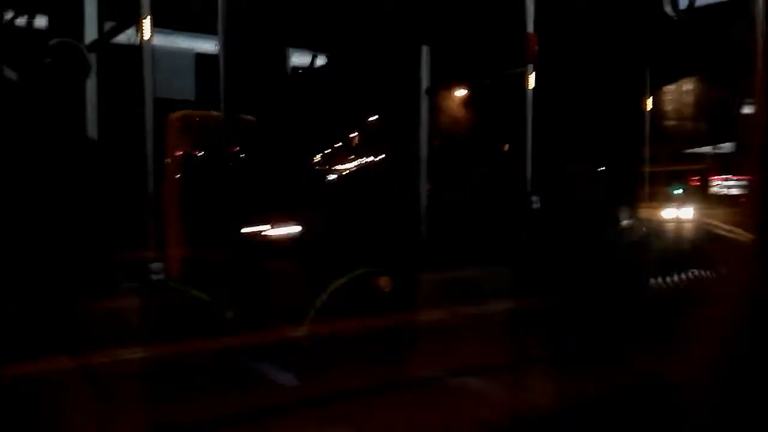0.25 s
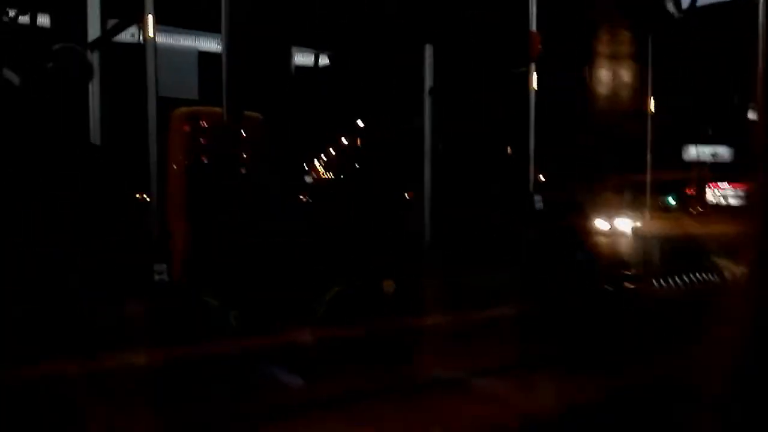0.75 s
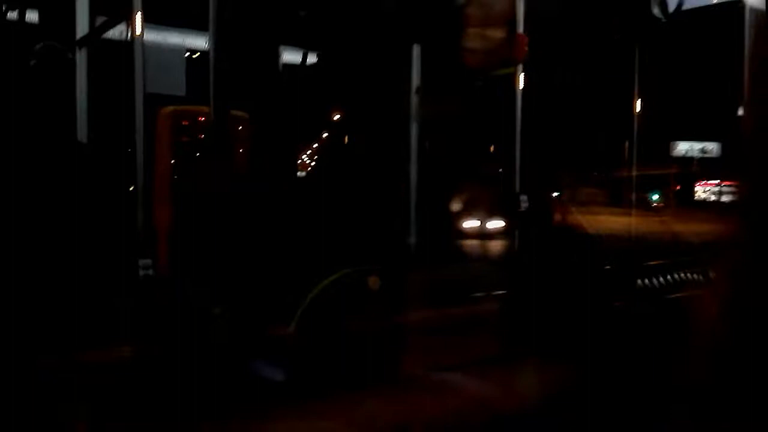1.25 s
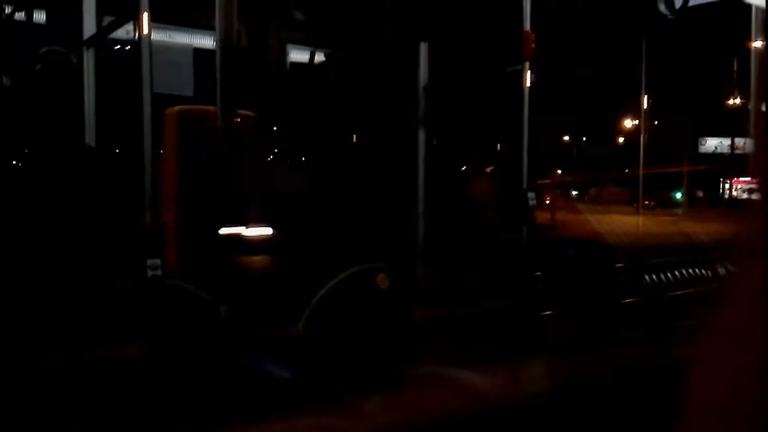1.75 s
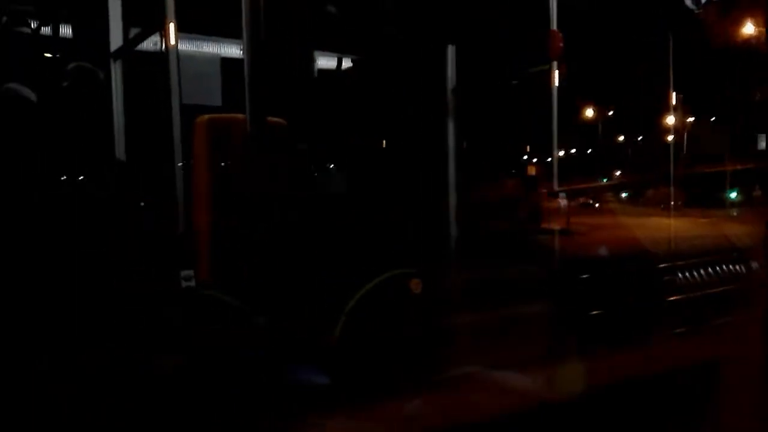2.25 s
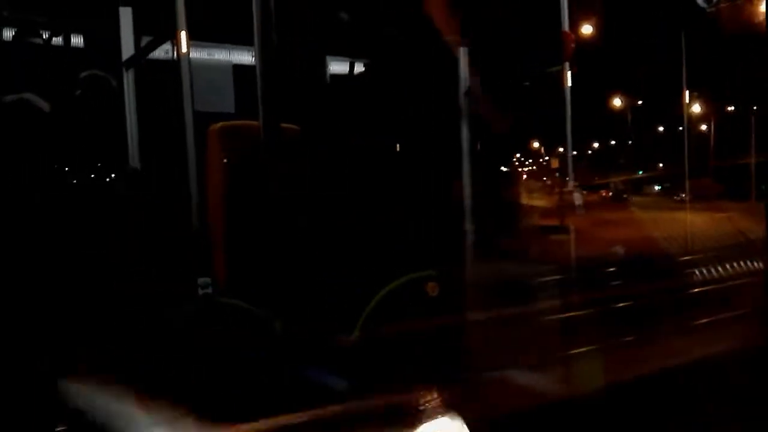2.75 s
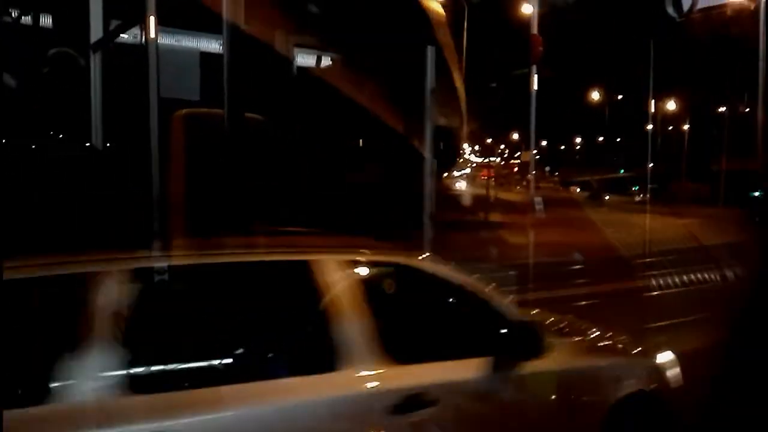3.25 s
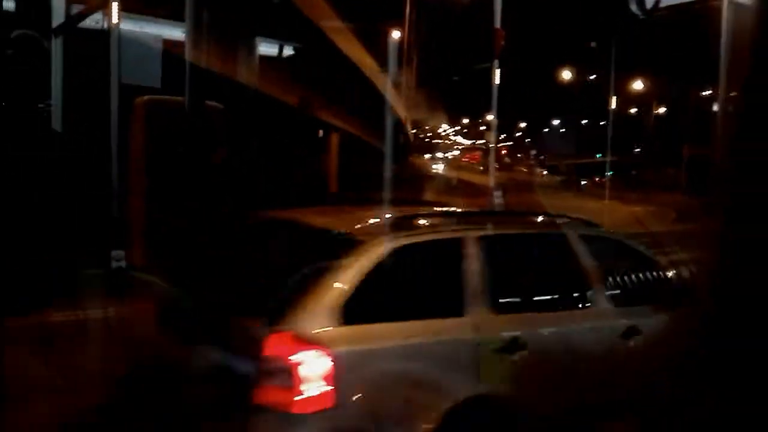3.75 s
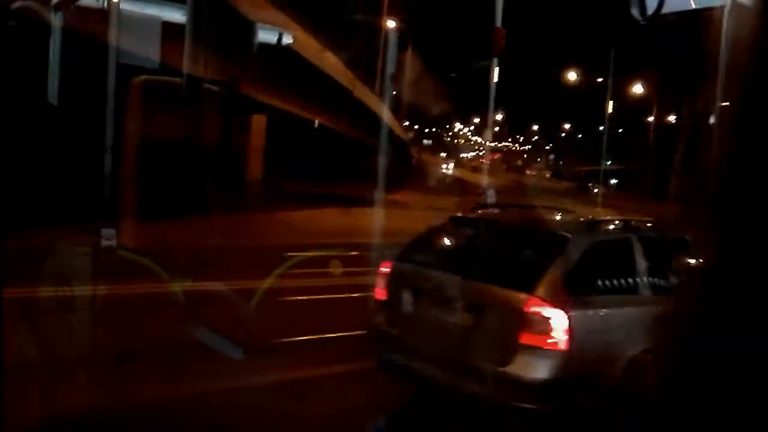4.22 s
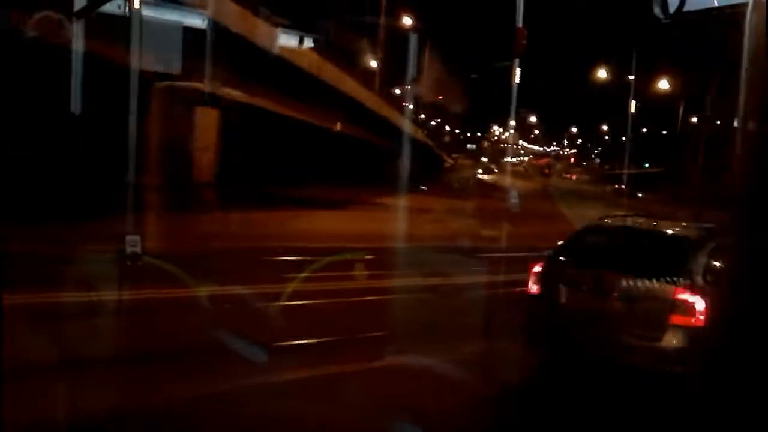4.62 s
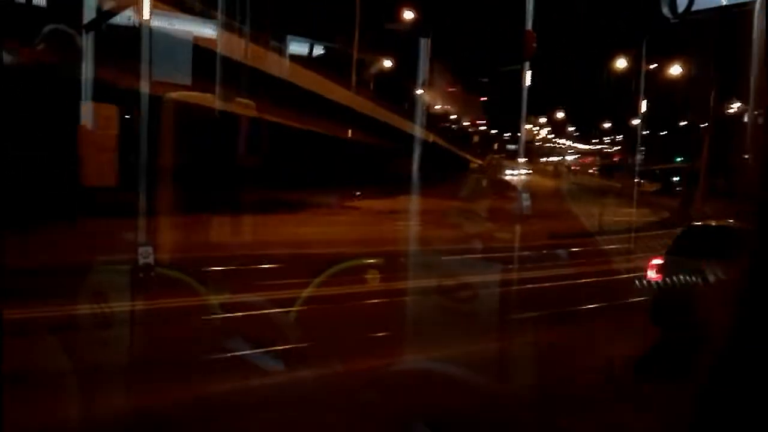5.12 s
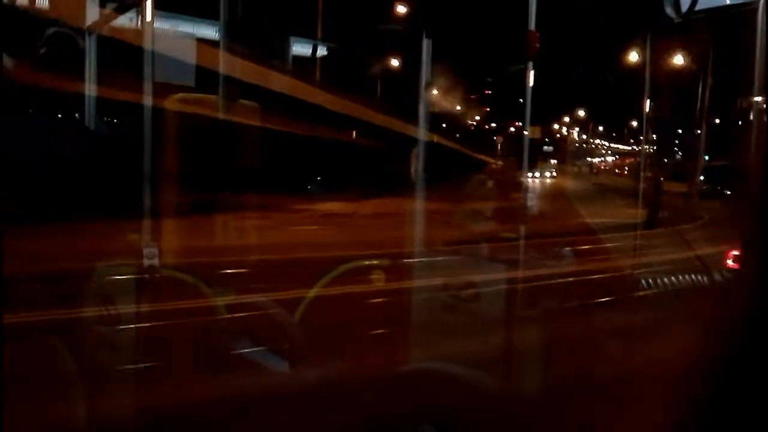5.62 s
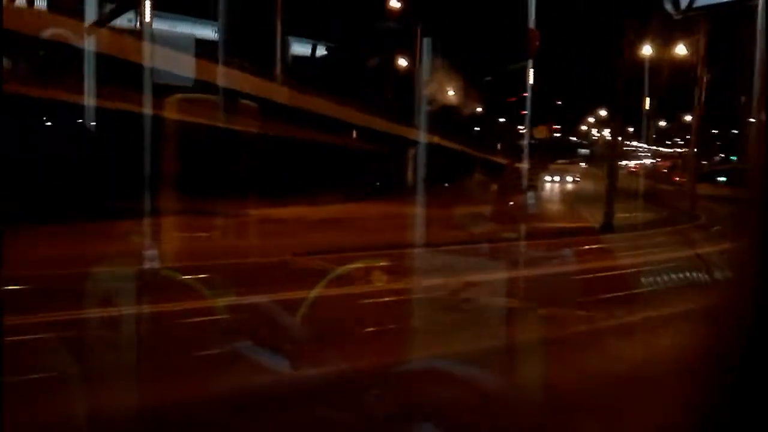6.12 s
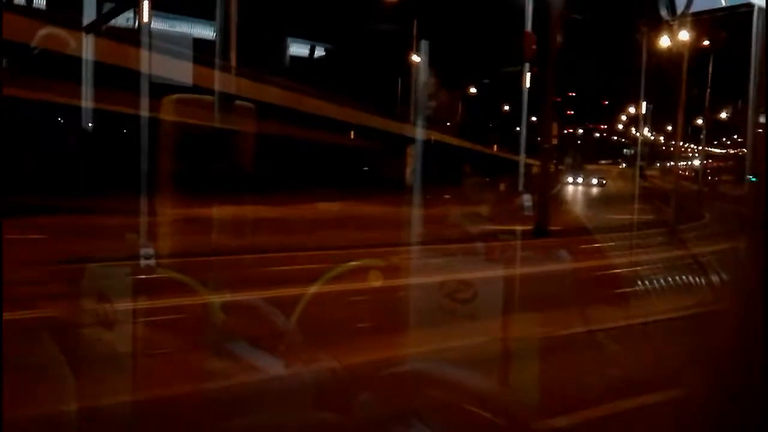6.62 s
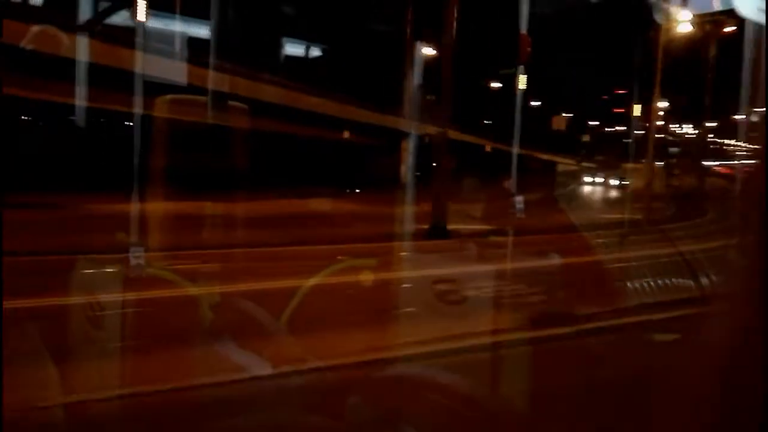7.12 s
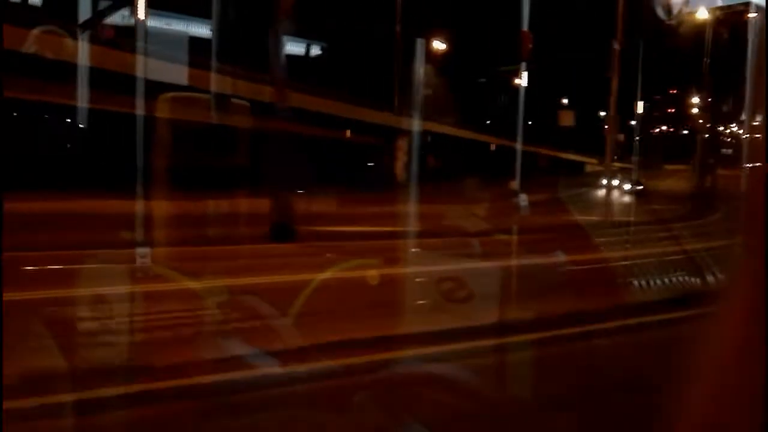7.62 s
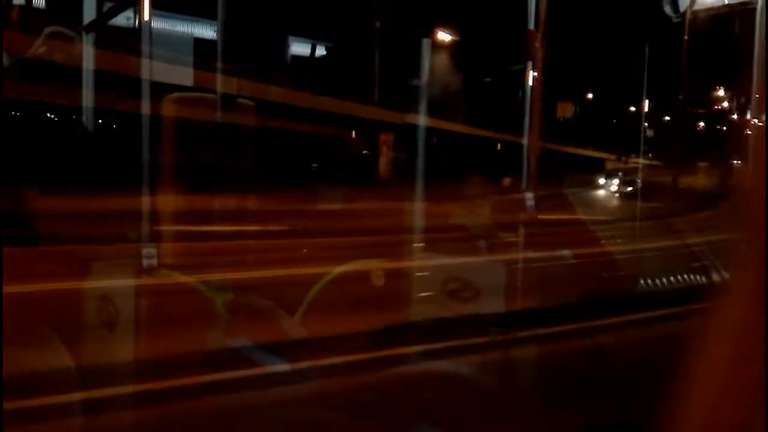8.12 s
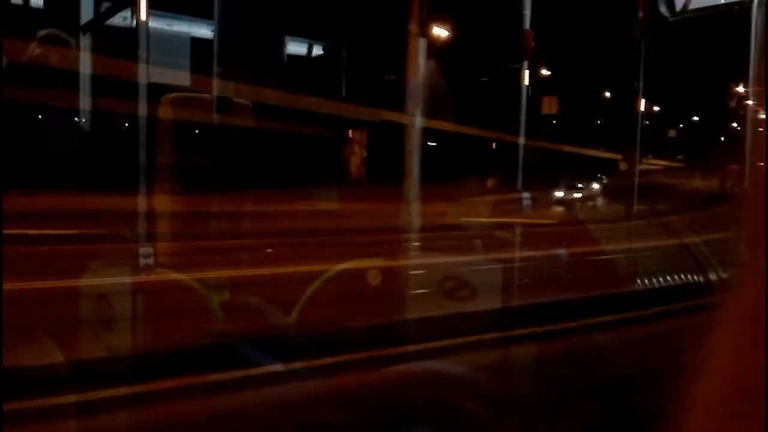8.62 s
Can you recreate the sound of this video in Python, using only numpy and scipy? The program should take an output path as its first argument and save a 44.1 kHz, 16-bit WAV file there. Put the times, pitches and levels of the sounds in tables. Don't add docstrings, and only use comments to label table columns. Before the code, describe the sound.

Inside a moving city bus at night: low steady diesel drone, tyre roar, soft floor thuds, tiny trim ticks and a few knocks.

```python
import sys
import numpy as np
from scipy import signal
from scipy.io import wavfile
from scipy.ndimage import uniform_filter1d

SR = 44100
rng = np.random.default_rng(int(sys.argv[2]) if len(sys.argv) > 2 else 0)


def int16_out(signal):
    q = np.round(np.clip(np.atleast_2d(signal).T, -1, 1) * 32767)
    wavfile.write(sys.argv[1], SR, q.astype(np.int16))


def gain_from_decibels(decibels):
    exponent = np.asarray(decibels, float) / 20
    return 10 ** exponent


N = 391166

# time_s, level_db
ASPHALT = [(0, 1), (.22, 0), (.34, 2.5), (.6, .5), (1.65, -0.15), (2.2, .8), (2.65, -0.1), (5, -0.5),
           (6.9, -1.13), (7.6, 0.4), (8, 1.2), (8.87, 1.3)]
# pitch_hz, level_db (per Hz)
THUD_COLOUR = [(3, -22), (8, -7), (20, -4.5), (32, 7), (45, -9), (60, -7), (90, -49)]
ROAR_COLOUR = [(30, -27), (60, -2.5), (110, -3.5), (150, -4.5), (180, -6.5), (240, -7), (300, -9),
               (400, -16.5), (480, -18.5), (540, -22), (1000, -22), (1500, -27), (2000, -34.5),
               (3500, -42.5)]
HISS_COLOUR = [(1500, -29), (2500, -4.5), (3600, -2), (4600, -5), (7000, -5.5), (9000, -14), (11000, -33)]
FIZZ_COLOUR = [(6000, -34), (9000, 0), (11000, -2.5), (14500, -9), (16000, -34)]
# start_s, hold_s, axle_hop_db, floor_thud_db
ROAD_BUMPS = [(0.0, .01, -16, -29), (.33, .13, -15, -26), (.6, .3, -21, -35), (1.0, .16, -20, -31),
              (1.45, .85, -29, -38), (2.64, .02, -36, -31), (3.1, .52, -28, -34), (3.9, .55, -30, -37),
              (4.92, .02, -28, -37), (5.11, .02, -23.5, -41), (5.45, .05, -28, -41), (6.1, .2, -29, -43),
              (6.45, .08, -24.5, -42), (7.1, .4, -33, -38), (7.8, .2, -30, -36), (8.3, .12, -21, -38),
              (8.82, .02, -32, -31)]
# time_s, pitch_hz, level_db
FAN_TONE = [(0, 850, -70), (2.6, 853, -60), (4, 861, -55.5), (5.3, 854, -59.5), (7, 848, -51.5),
            (8.87, 849, -70)]
# time_s, pitch_hz
TURBO_PITCH = [(1.6, 5000), (2, 5030), (2.82, 5305), (3.5, 5465), (4.65, 5400), (5.3, 5190), (5.7, 5000)]
# start_s, end_s, level_db
TURBO_WHISTLES = [(1.74, 1.8, -77), (1.94, 2.07, -69.5), (2.2, 2.31, -73), (2.43, 2.46, -73),
                  (2.64, 2.69, -72), (2.78, 2.84, -71), (2.95, 2.99, -72), (3.08, 3.14, -73.5),
                  (3.4, 3.57, -70), (4.8, 4.85, -78), (5.09, 5.13, -79), (5.44, 5.5, -71),
                  (5.57, 5.62, -70)]
# start_s, peak_db, ring_hz
TRIM_TICKS = [(0.0952, -59, 10200), (0.164, -51, 9730), (0.2553, -59, 9720), (0.401, -63, 9530),
              (0.9197, -50.5, 12900), (0.9737, -60, 9810), (1.0091, -56, 11200), (1.4486, -62, 10800),
              (1.7499, -63, 10500), (2.0757, -56, 12200), (2.135, -56, 9920), (2.1695, -64, 10300),
              (2.2338, -62, 11000), (2.4049, -57, 10700), (2.9687, -59, 11000), (3.6536, -54, 11200),
              (3.8122, -57, 9850), (4.0183, -62, 9980), (4.2398, -57, 12100), (4.3735, -56, 11900),
              (4.8918, -62, 10000), (5.0393, -59, 12100), (5.1257, -60, 11200), (5.3293, -58, 12200),
              (5.5228, -57, 10900), (7.0683, -56, 9960), (7.3706, -60, 10100), (7.4994, -61, 11200),
              (8.2137, -61, 9670), (8.2397, -60, 11500)]
# start_s, level_db, centre_hz, decay_s (to -60 dB)
PANEL_KNOCKS = [(.272, -58, 5000, .06), (.298, -59, 4500, 0.09), (.355, -72, 12000, .1),
                (.399, -72, 11800, .08), (.92, -49.5, 6900, .03), (.921, -53, 3500, .04),
                (4.245, -59, 6300, .15), (4.79, -68, 11500, .04), (7.28, -59, 4500, .076),
                (7.358, -58, 5870, .05), (7.371, -47.5, 6500, .16), (7.428, -59, 6500, .072),
                (7.794, -42, 3260, 0.12), (7.797, -54, 5570, .08), (8.1, -60, 6000, .097),
                (8.266, -46, 3050, 0.16)]
# start_s, level_db, centre_hz, decay_s (to -60 dB)
PLATE_SLAPS = [(.254, -52.5, 6500, 0.097), (.921, -57, 8500, 0.027), (.29, -52, 3000, .3),
               (.39, -55, 3500, .15), (7.372, -48.5, 3000, 0.22), (7.794, -40, 1300, 0.13),
               (7.795, -47.5, 2400, .12), (7.834, -53, 3500, .1), (8.255, -47, 1000, .061),
               (8.258, -48, 2800, .15)]
# start_s, level_db, centre_hz, decay_s (to -60 dB)
BELLOWS_SCRAPES = [
    (.289, -56, 5300, 0.66),
    (.385, -62, 6000, .2),
]
# start_s, level_db, centre_hz, decay_s (to -60 dB)
SEAL_RUBS = [(.272, -66, 13000, .3), (.58, -71, 11500, .2), (.71, -70, 11500, .2), (1.47, -73, 11500, .2),
             (2.465, -69, 10800, .2), (4.245, -70, 11500, .15), (4.33, -70, 11000, .3),
             (6.29, -72, 10500, .2), (4.34, -63, 6470, .3), (4.48, -59, 6060, 0.18),
             (4.492, -55, 6200, 0.17), (4.495, -66, 8500, .16)]
# ratio_to_firing, level_db, slope_db (per Hz of speed), waver_db
GEAR_TONES = [
    (1.86, -35.5, 3.1, 1.8),
    (4.648, -43, .3, 1.2),
    (9.295, -56.5, 1.8, 2.5),
    (9.52, -50.8, -.5, .8),
]
AXLE_TEETH = (4.648, 9.295)
# start_s, end_s, level_db
AXLE_SLACK = (.15, 1.0, -9)
# time_s, firing_hz
FIRING_RATE = [(0.0, 50.46), (1.0, 50.7), (3.0, 51.77), (3.5, 51.86), (6.0, 51.88), (7.0, 52.38),
               (8.87, 53.62)]
# time_s, load_db
ENGINE_LOAD = [(0.0, -33), (0.25, -33.5), (0.6, -34), (1.25, -25.5), (3.52, -25), (3.75, -34),
               (4.25, -39.5), (4.45, -26.5), (4.8, -28), (5.0, -36), (5.5, -45), (5.8, -32.5), (6.25, -38),
               (6.5, -39), (7.25, -44), (7.7, -32), (8.0, -33), (8.87, -34)]
# ratio_to_firing, level_db (at middling load), load_share, slope_db (per Hz), waver_db
MAIN_ORDERS = [(1.5, -36.5, .05, .8, 2.1), (2, -41.5, .3, -3.1, 3), (2.5, -41.5, .3, -5.1, 1.2)]
# ratio_to_firing, level_db
UNEVEN_ORDERS = [(4 / 3, -68), (11 / 6, -49.5), (13 / 6, -47), (7 / 3, -44), (8 / 3, -61), (17 / 6, -48.5),
                 (2.8, -51), (3.5, -53), (5.5, -52)]

CRUISE_HZ = 52


def evened(x):
    return x / np.sqrt(np.mean(x ** 2) + 1e-20)


def curves(rows):
    s, *columns = np.transpose(rows)
    return [np.interp(np.arange(N) / SR, s, column) for column in columns]


def add(mix, s, sound):
    part = mix[round(s * SR):][:len(sound)]
    part += sound[:len(part)]


def drift(rate_hz):
    knots = np.clip(rng.standard_normal(400), -1.7, 1.7)
    return np.interp(np.arange(N) / SR * rate_hz, np.arange(400), knots)


def stretch(start, end, rise_db_s, fall_db_s):
    t = np.arange(N) / SR
    return -rise_db_s * np.maximum(start - t, 0) - fall_db_s * np.maximum(t - end, 0)


def tone(hz, db, waver_db=1.0):
    turns = np.cumsum(hz) / SR + rng.random()
    level = np.sqrt(2) * gain_from_decibels(db + waver_db * drift(8))
    return level * np.cos(2 * np.pi * turns)


def noise(shape, size, patchy_db, flicker_db):
    frames, hz = 4 * N // size + 5, np.fft.rfftfreq(size, 1 / SR)
    a, b, patches = rng.standard_normal((frames, len(hz), 3)).T
    patches = uniform_filter1d(patches, size=12, axis=0)
    patches = evened(uniform_filter1d(patches, size=9, axis=1))
    flicker = evened(uniform_filter1d(rng.standard_normal(frames), size=5))
    f, db = np.transpose(shape)
    colour_db = np.interp(np.log(hz + 1), np.log(f + 1), db, -120, -120)
    level_db = colour_db[:, None] + patchy_db * patches + flicker_db * flicker
    spectra = (a + 1j * b) * gain_from_decibels(level_db)
    return evened(signal.istft(spectra, nperseg=size, noverlap=3 * size // 4)[1][:N])


def band(x, hz, width_hz):
    low, high = max(hz - width_hz / 2, 100), min(hz + width_hz / 2, 16000)
    ring = signal.butter(2, (low, high), "band", fs=SR, output="sos")
    return evened(signal.sosfilt(ring, x))


def bumps():
    rise_db_s, fall_db_s, smooth_road_db = 112, 86, -38
    shapes = np.array([stretch(s, s + hold, rise_db_s, fall_db_s) for s, hold, _, _ in ROAD_BUMPS])
    _, _, hop_db, thud_db = np.transpose(ROAD_BUMPS)[:, :, None]
    hop = np.maximum((shapes + hop_db).max(axis=0), smooth_road_db)
    thud = np.maximum((shapes + thud_db).max(axis=0), smooth_road_db)
    return hop, thud


def road(thud_db):
    coarse_db, = curves(ASPHALT)
    thud = gain_from_decibels(thud_db + 1.2) * noise(THUD_COLOUR, size=8192, patchy_db=5.0, flicker_db=0.1)
    roar_colour = ROAR_COLOUR + [(5000, -57.5), (8000, -70)]
    roar = gain_from_decibels(-34 + 0.78 * coarse_db) * noise(roar_colour, size=2048, patchy_db=0.85, flicker_db=-0.04)
    hiss = gain_from_decibels(-61 + 1.07 * coarse_db) * noise(HISS_COLOUR, size=512, patchy_db=1.6, flicker_db=0.57)
    fizz = gain_from_decibels(-76.5 + 0.97 * coarse_db) * noise(FIZZ_COLOUR, size=512, patchy_db=1.3, flicker_db=1.5)
    return thud + roar + hiss + fizz


def axle_hop(db):
    hop_hz = 12.6
    front = np.cos(2 * np.pi * np.cumsum(hop_hz + 1.174 * drift(8.3)) / SR)
    rear = np.sin(2 * np.pi * np.cumsum(1.22 * hop_hz + 1.47 * drift(7)) / SR)
    sway = np.cos(2 * np.pi * np.cumsum(0.7 * hop_hz + 1.5 * drift(7)) / SR)
    return -np.sqrt(2) * gain_from_decibels(db) * (front + gain_from_decibels(-11) * rear + gain_from_decibels(-13.0) * sway)


def trim():
    decay_s, rise_s = 0.026, 0.0006
    out, t = np.zeros(N), np.arange(2600) / SR
    chance = rng.standard_normal((len(TRIM_TICKS), 2, len(t)))
    for (s, db, hz), (a, b) in zip(TRIM_TICKS, chance):
        snap = band(a, hz, 2700) + gain_from_decibels(-3) * band(b, 7500, 5000)
        swell = gain_from_decibels(db - 3.5 - 60 * t / decay_s) * (1 - np.exp(-t / rise_s))
        add(out, s, swell * snap)
    return out


def contacts(rows, width_share, rise_s):
    out, t = np.zeros(N), np.arange(12000) / SR
    chance = rng.standard_normal((len(rows), 2, len(t)))
    for (s, db, hz, decay_s), (a, b) in zip(rows, chance):
        slips = gain_from_decibels(2.8 * evened(uniform_filter1d(b, size=160)))
        fade = gain_from_decibels(db - 60 * np.maximum(t - rise_s, 0) / decay_s)
        swell = np.minimum(t / rise_s, 1) * fade
        add(out, s, swell * slips * band(a, hz, width_share * hz))
    return out


def joint():
    knocks = contacts(PANEL_KNOCKS, width_share=0.36, rise_s=0.0047)
    slaps = contacts(PLATE_SLAPS, width_share=0.77, rise_s=0.0016)
    scrapes = contacts(BELLOWS_SCRAPES, width_share=1.2, rise_s=0.013)
    rubs = contacts(SEAL_RUBS, width_share=0.32, rise_s=0.012)
    return knocks + slaps + scrapes + rubs


def cabin(x):
    t = np.arange(9000) / SR
    tail = rng.standard_normal(len(t)) * gain_from_decibels(-60 * t / 0.4) * (t > 0.003)
    return x + gain_from_decibels(-11.5) * signal.oaconvolve(x, tail / np.linalg.norm(tail))[:N]


def fan():
    hz, db = curves(FAN_TONE)
    return tone(hz + 7 * drift(18), db - 4.5, waver_db=2.6)


def turbocharger():
    hz, = curves(TURBO_PITCH)
    edge_db_s = 12 / 0.06
    whistles = [db + stretch(start, end, edge_db_s, edge_db_s) for start, end, db in TURBO_WHISTLES]
    flutter_db = 2.1 * drift(14) + 1.5 * drift(25)
    return tone(hz + 10 * drift(30), np.max(whistles, axis=0) + flutter_db, waver_db=0.5)


def driveline(firing):
    start, end, slack_db = AXLE_SLACK
    slack_db = slack_db * gain_from_decibels(stretch(start, end, 90, 35))
    out = tone(0.93 * firing, -44, waver_db=7.0)
    for ratio, db, slope, waver_db in GEAR_TONES:
        level_db = db + slope * (firing - CRUISE_HZ) + waver_db * drift(3.3)
        if ratio in AXLE_TEETH:
            level_db = level_db + slack_db
        out += tone(ratio * firing, level_db, waver_db=1.04)
    return out


def engine(firing):
    mid_load_db = -33
    load_db, = curves(ENGINE_LOAD)
    out = tone(firing, load_db, waver_db=2.6)
    for ratio, db, share, slope, waver_db in MAIN_ORDERS:
        pull_db = share * (load_db - mid_load_db)
        speed_db = slope * (firing - CRUISE_HZ)
        out += tone(ratio * firing, db + pull_db + speed_db + waver_db * drift(4), waver_db=1.4)
    for ratio, db in UNEVEN_ORDERS:
        out += tone(ratio * firing, db, waver_db=2.5)
    return out


def scene():
    firing, = curves(FIRING_RATE)
    hop_db, thud_db = bumps()
    ride = road(thud_db) + axle_hop(hop_db)
    rattles = cabin(trim() + joint())
    machinery = fan() + turbocharger() + driveline(firing) + engine(firing)
    return (ride + rattles + machinery)[None]


def roll_off(x):
    return signal.sosfilt(signal.butter(12, 14300, fs=SR, output="sos"), x)


def record(dry):
    return roll_off(dry)


dry = scene()
out = record(dry)
int16_out(out)
```